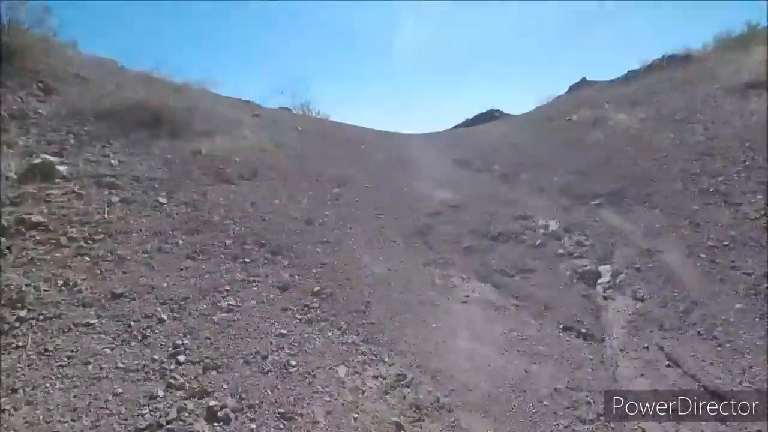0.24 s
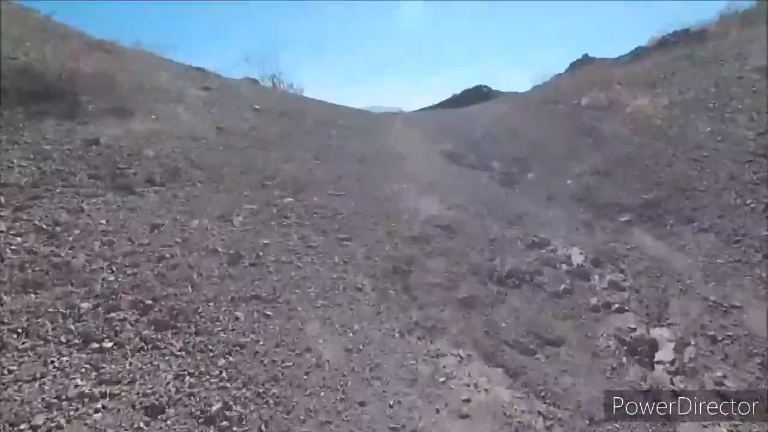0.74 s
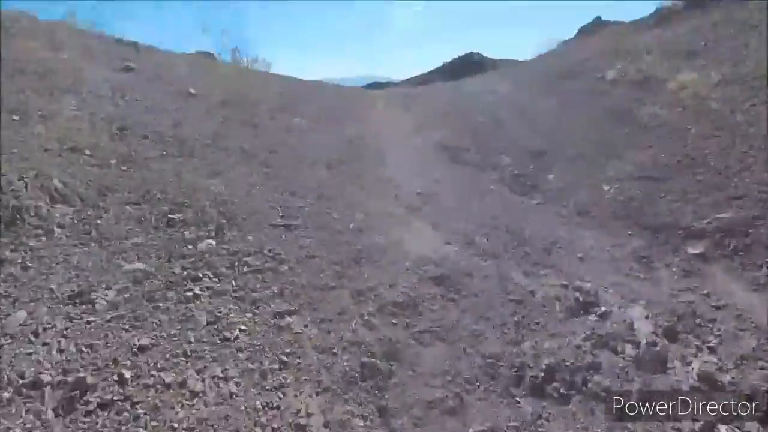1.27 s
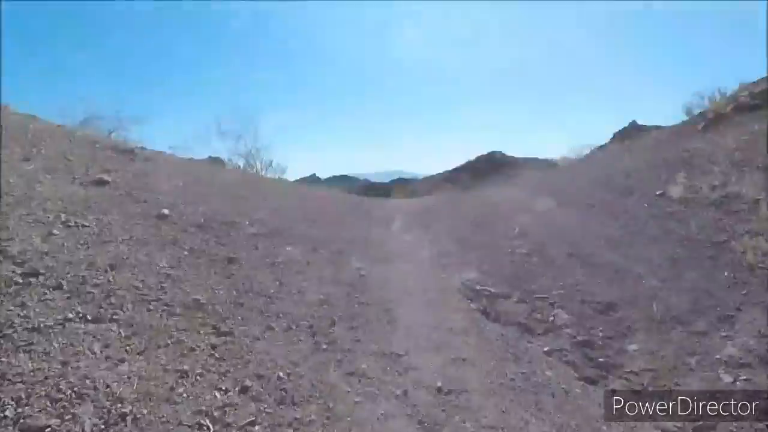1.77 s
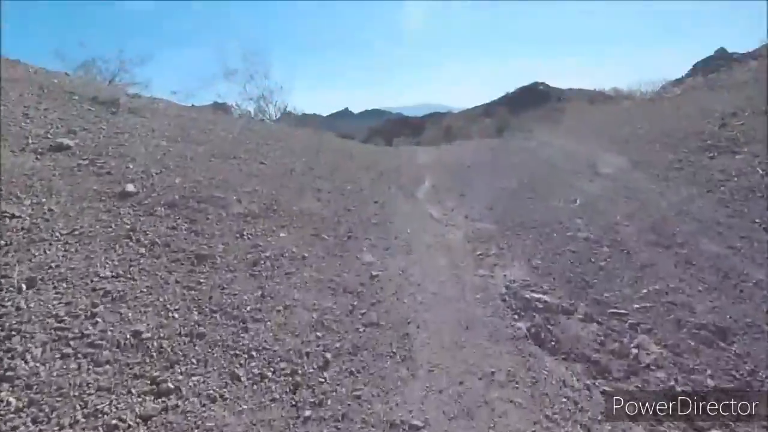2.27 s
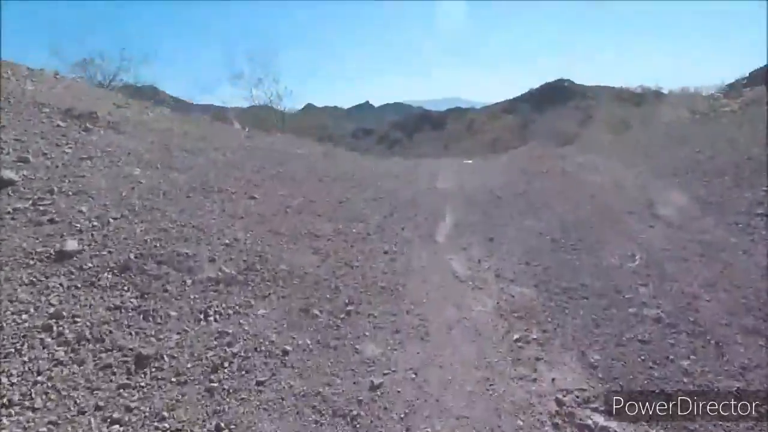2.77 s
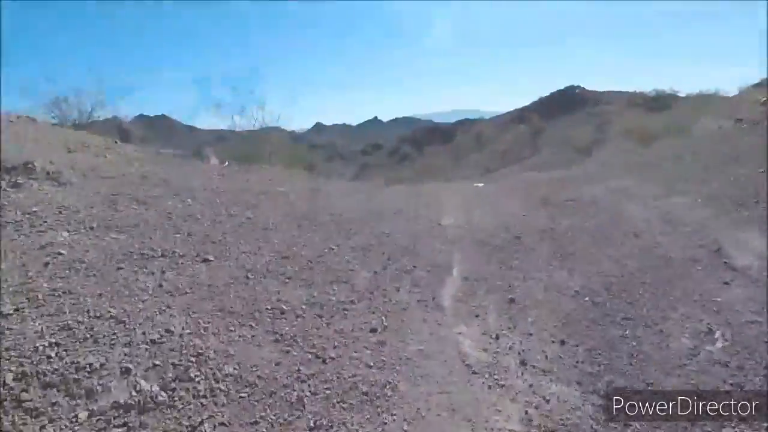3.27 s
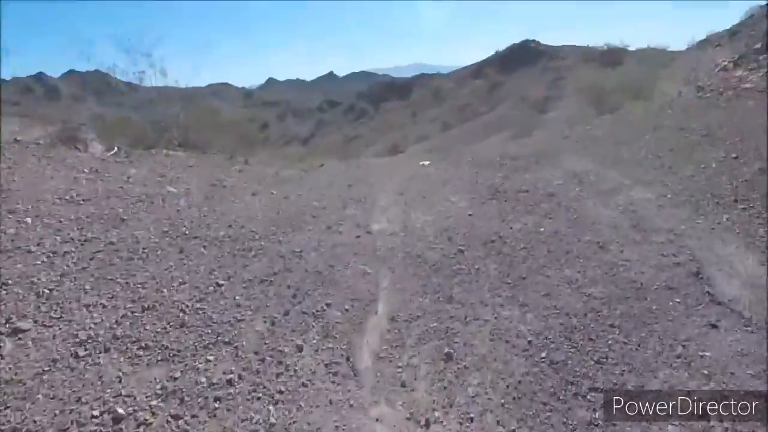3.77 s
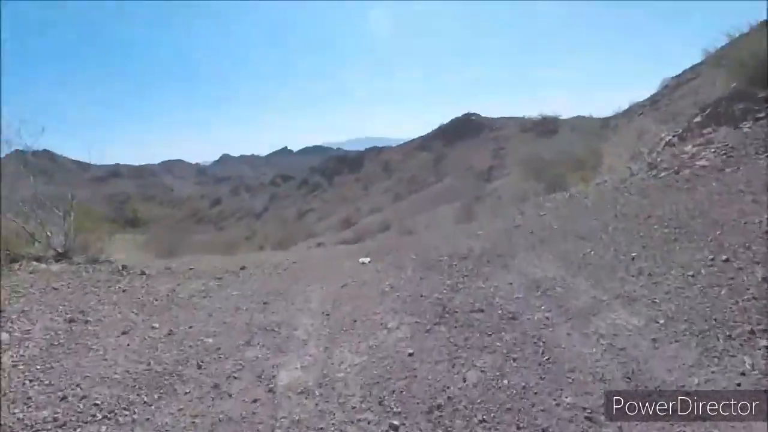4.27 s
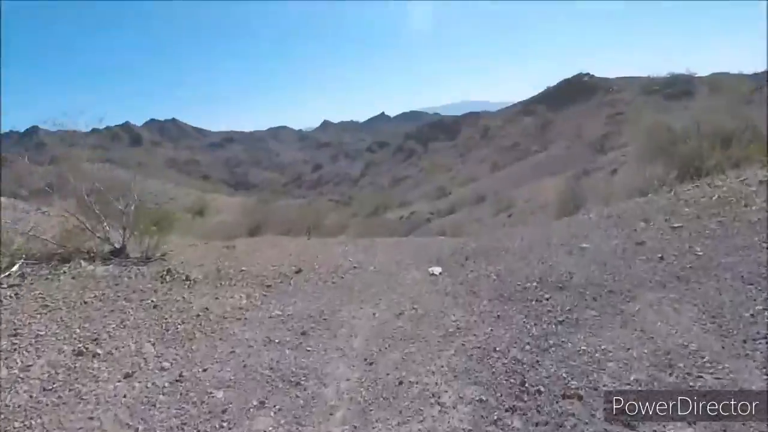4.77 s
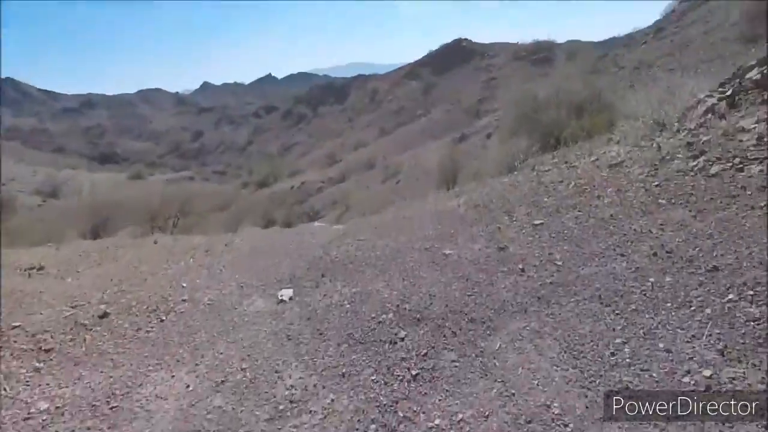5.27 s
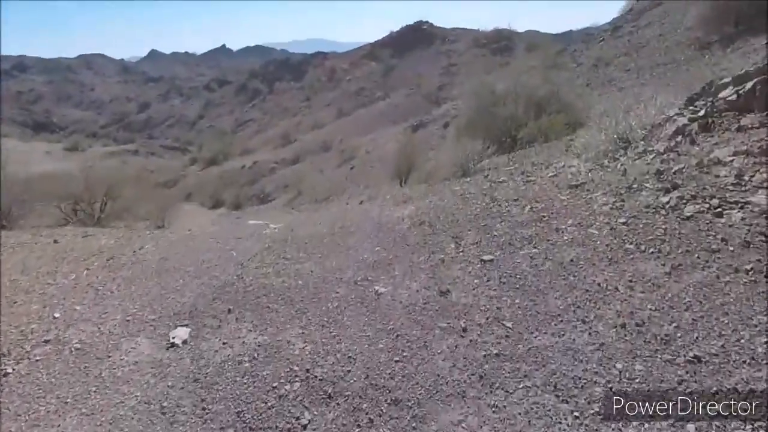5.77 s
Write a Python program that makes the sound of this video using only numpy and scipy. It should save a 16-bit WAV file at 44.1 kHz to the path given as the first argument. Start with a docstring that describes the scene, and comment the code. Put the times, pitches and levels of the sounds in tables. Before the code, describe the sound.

Close gravel footsteps in a steady, quick jog: a crunch and clack from the heel, then a duller, heavier forefoot landing with rattling stones. Loose pebbles tick and trickle between steps. Outdoors and dry, with no echo, the worn camera thuds and its plastic case resonates, wind buffets the microphone, and faint steady hiss continues. The last steps are lighter.

```python
"""Jogging on loose gravel

Someone jogs along a desert trail, about three steps a second, and slows near the end.
Heel and toe crunch and clack the stones: random small rings and filtered noise swell with each contact.
Landings and push-offs jolt a body-worn camera with short, low swings; its plastic case adds resonances.
Filtered noise makes the wind rumbling across the microphone and a thin, steady hiss."""
import sys
import numpy as np
from scipy import signal
from scipy.fft import rfft, irfft, next_fast_len
from scipy.io import wavfile
from scipy.ndimage import uniform_filter1d, map_coordinates

SR = 44100
rng = np.random.default_rng(int(sys.argv[2]) if len(sys.argv) > 2 else 0)


def waveform_to_disk(signal):
    """Save audio, clipped to [-1, 1], as 16-bit WAV at the path in sys.argv[1]."""
    frames = np.transpose(np.atleast_2d(signal))
    scaled = np.clip(frames, -1, 1) * 32767
    samples = np.round(scaled).astype(np.int16)
    wavfile.write(sys.argv[1], SR, samples)


N = 265482
TIME = np.arange(N) / SR

# All levels in dB are relative: each sound's function adds its own overall gain.
# the heel strikes, then rolls into the gravel: start_s, roll_s (to the hardest press),
# clack_db, ground_db (packed ground), crunch_db, grit_db
HEELS = [(0.008, 0.025, -21, -23.5, -37.5, -46), (0.313, 0.033, -22, -19.5, -33.5, -65),
         (0.616, 0.031, -19.5, -22, -38.5, -69), (0.954, 0.039, -20.5, -20.5, -38.5, -56),
         (1.262, 0.036, -19.5, -19.5, -34.5, -54), (1.573, 0.036, -20, -27, -42, -60),
         (1.8995, 0.033, -16, -18, -34.5, -56), (2.263, 0.015, -23.5, -32, -45, -66),
         (2.611, 0.029, -20, -19.5, -36, -51), (2.972, 0.039, -24, -27, -38.5, -54),
         (3.3417, 0.042, -14.5, -20.5, -33, -53), (3.6601, 0.033, -14.5, -23.5, -36, -56),
         (4.0456, 0.023, -20, -28, -45, -54), (4.3957, 0.028, -23.5, -26, -39, -55),
         (4.7374, 0.029, -18, -25, -41, -59), (5.0985, 0.034, -17.5, -25, -38.5, -55),
         (5.484, 0.034, -40, -37.5, -36.5, -58), (5.863, 0.032, -52, -41, -60, -65)]
# the forefoot touches, then takes the weight: touch_s, weight_s, clack_db, crunch_db,
# grit_db, thump_db, jolt_db, jolt_hz
FOREFEET = [(0.1, 0.124, -36, -35.5, -51, -15, -4.5, 35.7),
            (0.392, 0.427, -24, -37, -51.5, -22, -7.5, 31.8),
            (0.738, 0.752, -25, -34.5, -48.5, -24.5, -4, 39.6),
            (1.043, 1.067, -21.5, -37.5, -49, -19.5, -9, 44.4),
            (1.328, 1.37, -24, -39, -52, -24.5, -7.5, 88), (1.658, 1.7, -26.5, -41.5, -56, -19, -6, 33.5),
            (1.989, 2.027, -18.5, -35.5, -52, -22, -8, 42), (2.314, 2.312, -23.5, -64, -76, -26, -15, 48.7),
            (2.708, 2.749, -17.5, -39.5, -52.5, -19, -14, 56),
            (3.059, 3.12, -27.5, -42, -51, -19.5, -10.5, 66),
            (3.447, 3.449, -44, -36, -53.5, -23, -8.5, 104),
            (3.787, 3.798, -18.5, -42, -53.5, -29.5, -11.5, 90),
            (4.104, 4.15, -20.5, -40.5, -55.5, -27, -10.5, 101.5),
            (4.49, 4.507, -35, -42.5, -57, -28.5, -9.5, 92.5),
            (4.812, 4.844, -17.5, -39.5, -52.5, -17, -6, 46.6),
            (5.14, 5.179, -22, -39, -59, -30, -11.5, 47.2), (5.505, 5.543, -28, -45.5, -55, -46, -12, 50.7),
            (5.707, 5.72, -52, -65, -79, -33, -31, 99), (5.948, 5.949, -34, -48.5, -59, -45, -15.5, 37.5)]
# larger stones tip and clack underfoot: start_s, level_db, pitch_hz (before random scatter)
TIPPED_STONES = [(0.13, -21, 1100), (0.397, -17, 1400), (0.405, -23, 1290), (0.455, -25, 1100),
                 (0.608, -29, 1400), (0.643, -35, 1450), (0.730, -28, 1350), (0.774, -29, 1400),
                 (0.941, -27, 1400), (1.003, -32, 1350), (1.012, -21.5, 1410), (1.018, -34, 1500),
                 (1.091, -28, 1400), (1.301, -20, 1520), (1.311, -17.5, 1450), (1.701, -23, 1360),
                 (1.889, -28, 1400), (1.924, -25.5, 1500), (2.084, -27, 1430), (2.1976, -29, 1450),
                 (2.716, -19.5, 1350), (2.755, -26, 1350), (3.144, -30, 1400), (3.2168, -17, 1640),
                 (3.3733, -7.5, 1400), (3.739, -25, 1250), (3.756, -24.5, 1400), (4.062, -32, 1400),
                 (4.159, -30, 1350), (4.411, -38, 1602), (4.510, -27, 1300), (4.55, -25, 1190),
                 (4.833, -25, 1400), (5.603, -32, 1280)]
# stones held in the ground knock under the sole: start_s, level_db, pitch_hz
BURIED_STONES = [(0.1258, -13, 664), (0.338, -27, 616), (0.348, -30, 636), (0.397, -25, 716),
                 (0.454, -26, 664), (0.642, -28, 650), (0.653, -28, 617), (0.730, -22, 670),
                 (0.993, -18.5, 640), (1.015, -30, 715.6), (1.068, -18.5, 645), (1.093, -29, 730),
                 (1.334, -24, 664), (1.617, -27, 615), (1.698, -20.5, 660), (1.925, -20, 640),
                 (1.985, -33, 740), (2.046, -40, 646), (2.633, -19, 624), (2.975, -27, 713),
                 (3.217, -23, 584), (3.375, -16, 646), (3.385, -16, 780), (3.686, -25, 614),
                 (3.739, -26, 684), (4.105, -26, 640), (4.553, -24, 670), (4.812, -20, 520),
                 (4.829, -26, 679), (4.851, -19.5, 740), (5.102, -27, 690), (5.117, -35, 620),
                 (5.183, -30, 630), (5.864, -33, 660), (5.949, -26.5, 710)]
# the sole skids and sprays fine gravel: centre_s, length_s, level_db
SPRAYS = [(0.765, 0.021, -44), (1.29, 0.052, -46.5), (2.395, 0.036, -49), (2.709, 0.012, -42.5),
          (3.39, 0.024, -42.5), (4.836, 0.023, -42.5), (5.137, 0.013, -41), (5.51, 0.0099, -42),
          (5.97, 0.047, -49.5)]
# kicked pebbles click: start_s, level_db, pitch_hz
PEBBLES = [(0.1363, -25.5, 2250), (0.319, -45, 2700), (0.459, -42, 2700), (0.600, -49, 2880),
           (0.816, -50, 2860), (1.0172, -36, 2630), (1.307, -34, 2770), (1.333, -39, 2800),
           (1.355, -45, 2700), (1.657, -41.5, 2700), (1.680, -40.5, 2850), (1.9863, -36.5, 2430),
           (1.997, -36, 2680), (2.017, -41, 2800), (2.077, -37, 2206), (2.2257, -36.5, 2490),
           (2.3132, -32.5, 2360), (2.332, -58, 2800), (2.356, -43, 2750), (2.382, -48, 3000),
           (2.3974, -37, 2780), (2.4276, -39, 2480), (2.612, -48, 2625), (2.717, -33, 2350),
           (3.081, -41, 2940), (3.132, -36, 1970), (3.137, -42, 2040), (3.316, -44, 2880),
           (3.343, -40, 2700), (3.388, -33, 2560), (3.582, -43, 2800), (3.7387, -35, 2260),
           (3.7496, -33, 2550), (3.7887, -36, 2400), (4.105, -39.5, 2700), (4.123, -41, 2820),
           (4.129, -37, 2200), (4.548, -48, 2802), (4.815, -42, 2700), (4.895, -46, 2900),
           (4.912, -45, 2200), (5.068, -48, 2700), (5.15, -38, 2820), (5.469, -44, 2760),
           (5.516, -37.5, 2540), (5.889, -38, 1820)]
# a flat stone rings on after the blow: start_s, level_db, pitch_hz, t60_s (time to fade by 60 dB)
RINGS = [(0.136, -36, 1390, 0.19)]
# the foot rocks over and pushes off, jolting the camera: centre_s, level_db, swing_hz
PUSHES = [(0.452, -11, 31), (1.030, -6.5, 43.5), (1.086, -9.5, 56), (2.048, -7.5, 44.4), (2.769, -12, 45),
          (3.138, -15, 50.7), (4.922, -12.5, 28), (5.204, -12.5, 41)]
# air flow at the microphone: time_s, level_db
WIND = [(0.0, -16.5), (0.22, -23), (0.55, -24.5), (1.25, -24.5), (2.1, -22.5), (2.4, -27.5), (3.2, -22),
        (3.5, -25.5), (3.95, -22), (4.25, -25.5), (5.1, -23), (5.35, -26), (6.0, -24)]
# resonances of the camera case: pitch_hz, width_hz, level_db
CASE = [(266, 75, 5), (643, 72, 2), (850, 47, -11.5), (1236, 110, -1.5), (1380, 140, -7), (1963, 34, 10.5)]
# filter colour of the packed ground: pitch_hz, gain_db
GROUND_COLOUR = [(70, -21), (135, 10), (190, 2.5), (280, -1), (390, -1.5), (470, -9), (630, -8),
                 (760, -21.5), (880, -11), (1050, -23), (1500, -29), (4000, -34), (9000, -33), (15000, -74)]
# filter colour of the grinding stones: pitch_hz, gain_db
STONE_COLOUR = [(500, -33.5), (1000, 6), (1250, 3), (1480, 3), (1700, 8.5), (1850, -6.5), (2150, 1),
                (2500, -18), (4000, -0.5), (9000, -80)]
# filter colour of the fine grit: pitch_hz, gain_db
GRIT_COLOUR = [(1200, -28), (2200, -6), (2800, -4.5), (3600, -2.5), (4600, -6.5), (5700, -4), (7000, -11),
               (8700, 0), (10200, -2), (11200, -15), (14500, -61)]
# filter colour of single stones snapping: pitch_hz, gain_db
CRACKLE_COLOUR = [(700, -37.5), (1400, 7), (2000, 0), (2900, -9.5), (3900, -10), (5500, -17), (9000, -36),
                  (15000, -50)]
# filter colour of the clacks' rattle: pitch_hz, gain_db
CLACK_COLOUR = [(400, 3), (1020, -8), (1250, 5), (1500, 2), (1830, -0.5), (2100, -10.5), (2600, -6.5),
                (3000, -19), (3700, -10.5), (4500, -18), (9000, -13), (15000, -41)]
# filter colour of the spray: pitch_hz, gain_db
SPRAY_COLOUR = [(600, -2), (1300, 6), (2100, -3), (3200, -3), (4300, -9), (6000, -11), (9000, -32),
                (14000, -43)]
# filter colour of the trickling stones: pitch_hz, gain_db
TRICKLE_COLOUR = [(500, -25), (830, 9), (1030, -8), (1300, 2), (1500, 5.5), (1750, -7), (2100, -14),
                  (2800, -2.5), (4000, -4), (8000, -32), (15000, -56)]
# filter colour of the deep wind: pitch_hz, gain_db
RUMBLE_COLOUR = [(10, -13.5), (22, 3.5), (40, 1), (60, -7), (85, -4), (120, -10), (170, -21.5),
                 (300, -38.5), (700, -70)]
# filter colour of the quicker wind: pitch_hz, gain_db
FLUTTER_COLOUR = [(80, -14.5), (150, 0), (200, 1), (280, -3), (380, -12), (500, -12), (630, -22),
                  (760, -25.5), (1400, -31.5), (2500, -32.5), (6000, -101)]
# filter colour of the hiss: pitch_hz, gain_db
HISS_COLOUR = [(500, 9), (2000, 12), (3500, 8), (5000, 4.5), (7200, 1.5), (8300, 6), (8750, 9.5),
               (8940, 17.5), (9150, 6.5), (10200, 6), (11100, 0), (13500, -5), (15000, -77)]

HEEL_RISE_S, HEEL_FALL_S = 0.022, 0.012  # the heel presses in slowly and lets go quickly
FORE_PEAK_S, FORE_RISE_S, FORE_FALL_S = 0.0011, 0.02, 0.033  # peaks just after it takes the weight
ROLL_SHARE = 0.38  # a slower roll from touch to weight lengthens the swell
FORE_GROUND_DB = 10  # packed ground under the forefoot, relative to its crunch
AIRBORNE_DB, GRAZE_S, CATCH_S = -24, 0.014, 0.003  # the forefoot is quieter until just before it touches
SETTLE_DB, SETTLE_WIDTHS = -13.5, 1  # faint skirt of shifting stones around each contact
HEEL_CLACK_HZ, FORE_CLACK_HZ, PITCH_SCATTER = 1410, 1280, 0.045  # stones differ a little in size
HEEL_SCUFF_DB, LIGHT_SCUFF_DB = (-8.5, -13), (-11.5, -17.5)  # lead-in and after-rattle of a clack
SNAP_DB, SNAP_T60_S, SNAP_RISE_S = -3, 0.0097, 0.00067  # the clean ring at the heart of a clack
SCATTER_DB, SCATTER_FLIGHT_S = -9, 0.3  # loudest tick relative to the crunch; longest flight
SCATTER_FADE_DB_PER_S = 41  # later ticks land more softly
JOLT_END_S, JOLT_LEAD_CYCLES = 0.02113, 1.155  # a slower swing peaks earlier in the landing
HEEL_JOLT_HZ, HEEL_JOLT_DB = 57.6, 4  # the heel's own jolt, relative to its push on the ground
FLUTTER_DB, STILL_S, STILL_DB = -14.5, 5.17, -9  # flutter level; it sinks by STILL_DB from STILL_S on
TOP_HZ = 15200  # the camera's band limit


def gravel():
    """Packed ground thumps, stones grind and fine grit crackles as the shoe presses on them."""
    ground_push, stone_push, grit_push = pressure()
    ground = coloured(grains(rate=1400, hz=885, cycles=0.17, spread_db=2.0), GROUND_COLOUR)
    stones = coloured(grains(rate=480, hz=1660, cycles=0.9, spread_db=-5.0), STONE_COLOUR)
    grit = coloured(grains(rate=730, hz=3580, cycles=0.44, spread_db=-3.0), GRIT_COLOUR)
    ground = boxed(ground, case_db=-7.5)
    stones = boxed(stones, case_db=1.0)
    ground = steadied(patchy(ground, depth_db=2.0), span=0.04)
    stones = steadied(patchy(stones, depth_db=5.0), span=0.021)
    grit = steadied(patchy(grit, depth_db=4.5), span=0.043)
    # stones and grit slip in clumps, and a faint sifting of grit never stops
    slips = amp(1.54 * wobble(170))
    sifting = amp(np.interp(TIME, [0, 5, 6], [0, -.5, -3]) + 2.4 * wobble(40))
    grit_level = np.hypot(amp(-1.5) * grit_push, amp(-64.5) * sifting)
    return (amp(-0.27) * ground * ground_push
            + amp(-5.5) * stones * slips * stone_push
            + grit * slips * grit_level)


def pressure():
    """How hard packed ground, stones and grit are worked: the powers of all contacts add up."""
    power = np.zeros((3, N))
    for s, roll_s, _, *levels_db in HEELS:
        contact = press(s + roll_s, HEEL_RISE_S, HEEL_FALL_S)
        power += amp(levels_db)[:, None] ** 2 * contact
    for touch, weight, _, crunch_db, grit_db, *_ in FOREFEET:
        levels_db = [crunch_db + FORE_GROUND_DB, crunch_db, grit_db]
        rise_s = FORE_RISE_S + ROLL_SHARE * (weight - touch)
        airborne = (1 - np.tanh((TIME - touch + GRAZE_S) / CATCH_S)) / 2  # 1 in the air, 0 on the ground
        contact = amp(AIRBORNE_DB * airborne) ** 2 * press(weight + FORE_PEAK_S, rise_s, FORE_FALL_S)
        power += amp(levels_db)[:, None] ** 2 * contact
    return np.sqrt(power)


def press(peak_s, rise_s, fall_s):
    """Power of one contact: it swells, lets go and leaves the stones settling."""
    t = TIME - peak_s
    away = np.minimum(np.maximum(-t / rise_s, t / fall_s), 20)
    return np.exp(-away ** 2) + amp(SETTLE_DB) ** 2 * np.exp(-away / SETTLE_WIDTHS)


def crackle():
    """Single stones snap against each other under the sole: sharp ticks that follow the stones' pressure."""
    _, stone_push, _ = pressure()
    ticks = grains(rate=450, hz=2400, cycles=0.64, spread_db=1.5)
    return amp(-7.5) * steadied(coloured(ticks, CRACKLE_COLOUR), span=0.05) * stone_push


def knocks(lead_s=0.014, scuff_s=0.025, rise_s=0.0018, fall_s=0.0033):
    """A short scuff swells until heel, forefoot or tipped stone catches and clacks, then rattles away."""
    track = np.zeros(N)
    t = np.arange(-SR // 20, SR // 12) / SR
    rattle = coloured(grains(rate=1500, hz=1740, cycles=0.33, spread_db=-2.5), CLACK_COLOUR)
    clacks = [(s, db, HEEL_CLACK_HZ, HEEL_SCUFF_DB) for s, _, db, *_ in HEELS]
    clacks += [(s, db, FORE_CLACK_HZ, LIGHT_SCUFF_DB) for s, _, db, *_ in FOREFEET]
    clacks += [(s, db, hz, LIGHT_SCUFF_DB) for s, db, hz in TIPPED_STONES]
    for s, db, hz, (lead_db, scuff_db) in clacks:
        lead_in = amp(lead_db) * np.exp(-np.abs(t) / lead_s)
        after_rattle = amp(scuff_db) * np.exp(-np.abs(t) / scuff_s)
        scuff = np.where(t < 0, lead_in, after_rattle)
        swell = np.exp(np.minimum(t / rise_s, -t / fall_s)) + scuff
        hz = hz * np.exp(PITCH_SCATTER * rng.standard_normal())
        tone = signal.butter(1, [hz * 0.58, hz * 1.18], "bandpass", fs=SR)
        piece = rattle[rng.integers(N - len(t)):][:len(t)]  # a random stretch of rattle
        chatter = steadied(signal.lfilter(*tone, piece), span=0.0053)
        add(track, s + 0.001777 + t[0], amp(db - 9.5) * chatter * swell)
        add(track, s + t[0], amp(db + SNAP_DB) * snap(t, hz))
    return boxed(track, case_db=-12.5)


def snap(t, hz):
    """Two stones catch and ring for a few clean cycles; t is the time from that instant."""
    after = np.maximum(t, 0)
    onset = 1 - np.exp(-(after / SNAP_RISE_S) ** 2)
    return np.sin(2 * np.pi * hz * after) * amp(-60 * after / SNAP_T60_S) * onset


def thumps(t60=0.045, rise_s=0.00083, low_hz=112, high_hz=380, firm_db=-20, db_per_octave=14):
    """The full weight beds the stones with a dull, hollow noise burst, brighter on harder landings."""
    track = np.zeros(N)
    t = np.arange(SR // 10) / SR
    for _, s, _, _, _, db, _, _ in FOREFEET:
        top_hz = high_hz * 2 ** (max(db - firm_db, 0) / db_per_octave)
        body = signal.butter(2, [low_hz, top_hz], "bandpass", fs=SR)
        thud = signal.lfilter(*body, rng.standard_normal(2 * len(t)))[len(t):]
        envelope = amp(-60 * t / t60) * (1 - np.exp(-t / rise_s))
        add(track, s, amp(db - 1.5) * steadied(thud, span=0.0063) * envelope)
    return boxed(track, case_db=6)


def buried_stones():
    """Stones held fast in the ground give a low, compact knock."""
    track = np.zeros(N)
    for s, db, hz in BURIED_STONES:
        knock = click(hz, width=0.31, t60=0.029, skitter_db=-25.5)
        add(track, s, amp(db - 10.0) * knock)
    return track


def sprays():
    """A skid throws up a swell of tiny ticks."""
    power = sum(amp(db) ** 2 * np.exp(-((TIME - s) / length) ** 2) for s, length, db in SPRAYS)
    ticks = coloured(grains(rate=760, hz=3000, cycles=0.8, spread_db=-0.5), SPRAY_COLOUR)
    return steadied(ticks, span=0.12) * np.sqrt(power)


def pebbles():
    """Kicked pebbles click, short and dry."""
    track = np.zeros(N)
    for s, db, hz in PEBBLES:
        tick = click(hz, width=0.29, t60=0.013, skitter_db=-23)
        add(track, s, amp(db - 3) * tick)
    return track


def scatter(count=12):
    """Every forefoot landing flicks small pebbles, which tick down one by one at uneven gaps."""
    track = np.zeros(N)
    for _, s, _, crunch_db, *_ in FOREFEET:
        for flight, size, pitch in rng.random((count, 3)):
            delay = SCATTER_FLIGHT_S * flight
            tick = click(1300 * 2 ** (1.25 * pitch), width=0.27, t60=0.011, skitter_db=-22)
            level_db = crunch_db + SCATTER_DB - SCATTER_FADE_DB_PER_S * delay - 11 * size
            add(track, s + delay, amp(level_db) * tick)
    return track


def ringing():
    """A loose flat stone rings faintly for a moment: a sine that dies away."""
    track = np.zeros(N)
    t = np.arange(SR // 4) / SR
    for s, db, hz, t60 in RINGS:
        add(track, s, amp(db - 60 * t / t60) * np.sin(2 * np.pi * hz * t))
    return track


def jolts(cycles=0.64, judder_hz=118, judder_t60=0.11, judder_db=-11):
    """Each landing or push-off shakes the camera through a swing or two, and its mount judders."""
    track = np.zeros(N)
    shakes = [(s + roll_s, ground_db + HEEL_JOLT_DB, HEEL_JOLT_HZ)
              for s, roll_s, _, ground_db, *_ in HEELS]
    shakes += [(s + JOLT_END_S - JOLT_LEAD_CYCLES / hz, db, hz) for _, s, *_, db, hz in FOREFEET]
    for s, db, hz in shakes + PUSHES:
        near = np.abs(TIME - s) < .3
        t = TIME[near] - s
        swing = -np.cos(2 * np.pi * hz * t) * np.exp(-(hz * t / cycles) ** 2)
        after = np.maximum(t, 0)
        mount_hz = judder_hz * (1 + 0.071 * rng.standard_normal())
        judder = np.sin(2 * np.pi * mount_hz * after) * amp(judder_db - 60 * after / judder_t60)
        onset = 1 - np.exp(-after / 0.0016)
        track[near] += amp(db + 1.0) * (swing + judder * onset)
    return track


def trickle():
    """Loosened stones keep rustling and rolling throughout, less once the runner slows."""
    ticks = coloured(grains(rate=380, hz=1520, cycles=0.8, spread_db=3.0), TRICKLE_COLOUR)
    level_db = np.interp(TIME, [0, 5, 6], [-55.5, -56, -60])
    level_db = level_db + 2.0 * wobble(13) + 2.0 * wobble(110)
    return steadied(ticks, span=0.064) * amp(level_db)


def wind():
    """Eddies buffet the microphone: a deep noise rumble with a quicker flutter above it."""
    flow_db = np.interp(TIME, *np.transpose(WIND)) + 1.2 * wobble(9)
    slowing_db = np.interp(TIME, [STILL_S, N / SR], [0, STILL_DB])
    rumble = steadied(coloured(rng.standard_normal(N), RUMBLE_COLOUR), span=0.12)
    flutter = steadied(coloured(rng.standard_normal(N), FLUTTER_COLOUR), span=0.017)
    rumble_db = flow_db + 1.9 * wobble(18)
    flutter_db = flow_db + FLUTTER_DB + slowing_db + 2.74 * wobble(45)
    return rumble * amp(rumble_db) + flutter * amp(flutter_db)


def hiss():
    """The microphone's own hiss: steady noise with a narrow peak near 9 kHz."""
    return amp(-56.5) * coloured(rng.standard_normal(N), HISS_COLOUR)


def click(hz, width, t60, skitter_db):
    """One stone impact: crack, chatter and faint skitter in a broad resonance, rms 1 over its first 3 ms."""
    t = np.arange(SR // 16) / SR
    chatter = amp(-17.5 - 60 * t / t60) + amp(skitter_db - 60 * t / 0.11)
    force = rng.standard_normal(len(t)) * chatter
    force[0] += 2  # the sharp crack
    body = signal.butter(3, [hz / (1 + width), hz * (1 + width)], "bandpass", fs=SR)
    sound = signal.lfilter(*body, force)
    return sound / np.sqrt(np.mean(sound[t < .003] ** 2))


def grains(rate, hz, cycles, spread_db):
    """Random stone contacts, rate a second: damped rings up to an octave either side of hz."""
    count = int(rate * N / SR)
    when, pitch, size, sign = rng.random((count, 4)).T
    n = np.arange(SR // 250)
    turns = (hz * 2 ** (2 * pitch - 1))[:, None] * n / SR
    # a positive spread makes a few contacts strong, a negative one makes a few weak
    strength = amp(-spread_db * np.log(np.maximum(size, .01))) * np.sign(sign - .5)
    rings = strength[:, None] * np.cos(2 * np.pi * turns) * np.exp(-turns / cycles)
    places = (when * N).astype(int)[:, None] + n
    return np.bincount(places.ravel(), rings.ravel())[:N]


def patchy(x, depth_db):
    """Each patch of ground has its own pitches: the colour shifts every few hundredths of a second."""
    z = signal.stft(x, nperseg=256)[2]
    field = uniform_filter1d(rng.standard_normal(z.shape), size=4, axis=0)  # smooth across pitch
    field = uniform_filter1d(field, size=7, axis=1)  # and across time
    return signal.istft(z * amp(depth_db * unit(field)), nperseg=256)[1][:N]


def boxed(x, case_db=1):
    """The camera case adds its resonances to the sound that shakes it."""
    size = next_fast_len(N + SR // 2)
    f = np.fft.rfftfreq(size, 1 / SR)
    modes = sum(amp(db) * 1j * f * width / (hz * hz - f * f + 1j * f * width)
                for hz, width, db in CASE)
    return irfft(rfft(x, size) * (1 + amp(case_db) * modes), size)[:N]


def coloured(x, spectrum):
    """Filter x to the given pitch_hz, gain_db points without sounding ahead of time, at rms 1."""
    size = 2 * next_fast_len(N // 2 + SR // 4)
    hz, db = np.transpose(spectrum)
    gain = amp(np.interp(np.log(np.fft.rfftfreq(size, 1 / SR) + 1), np.log(hz), db))
    # folding the cepstrum gives a minimum-phase filter: it only reacts after its input
    cepstrum = irfft(np.log(gain), size)
    cepstrum[1:size // 2] *= 2
    cepstrum[size // 2 + 1:] = 0
    response = np.exp(rfft(cepstrum))
    return unit(irfft(rfft(x, size) * response, size)[:N])


def steadied(x, span):
    """Hold the rms near 1 over about span seconds and keep the faster grain."""
    size = int(span * SR / 2) + 1
    power = uniform_filter1d(uniform_filter1d(x * x, size), size)
    return x / np.sqrt(np.abs(power) + 1e-6)


def wobble(rate):
    """A smooth random curve through rate random points a second."""
    return map_coordinates(rng.standard_normal(int(N * rate / SR) + 4), [TIME * rate])


def amp(db):
    """Decibels to gain."""
    return 10 ** (np.asarray(db) / 20)


def unit(x):
    """Scale to rms 1."""
    return x / np.sqrt(np.mean(x ** 2) + 1e-20)


def add(track, s, sound):
    """Mix a sound into a track at s seconds."""
    at = round(s * SR) + np.arange(len(sound))
    inside = (at >= 0) & (at < N)
    track[at[inside]] += sound[inside]


def scene():
    """Footsteps, loose stones, camera jolts, wind and hiss in one channel."""
    steps = gravel() + crackle() + sprays() + knocks() + buried_stones() + thumps()
    loose_stones = pebbles() + scatter() + trickle() + ringing()
    return (steps + loose_stones + jolts() + wind() + hiss())[None]


def record(dry):
    """The camera keeps nothing above its band limit."""
    size = next_fast_len(N + SR // 2)
    kept = np.fft.rfftfreq(size, 1 / SR) < TOP_HZ
    return irfft(rfft(dry, size) * kept, size)[..., :N]


dry = scene()
out = record(dry)
waveform_to_disk(out)
```